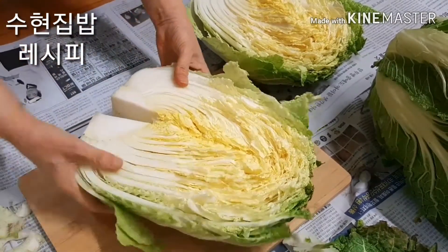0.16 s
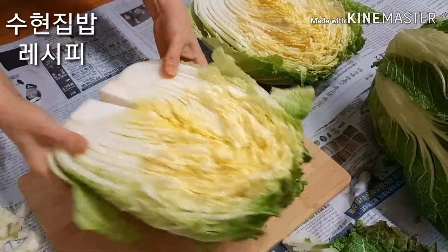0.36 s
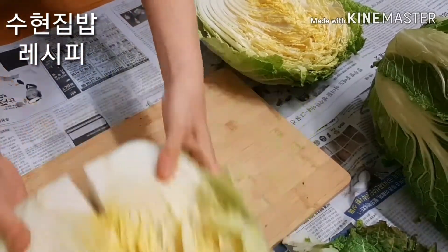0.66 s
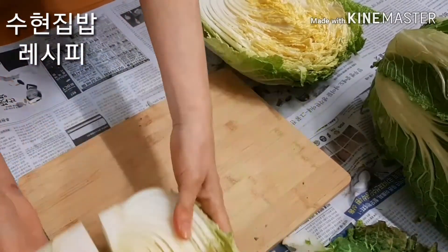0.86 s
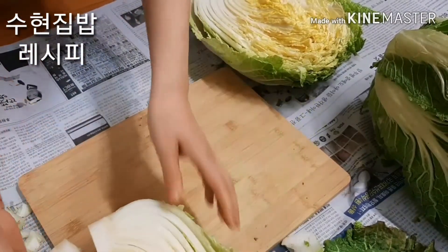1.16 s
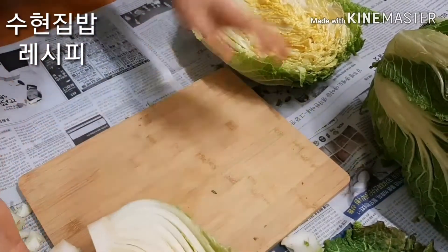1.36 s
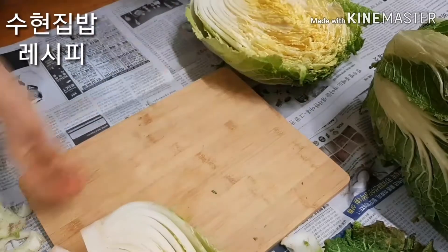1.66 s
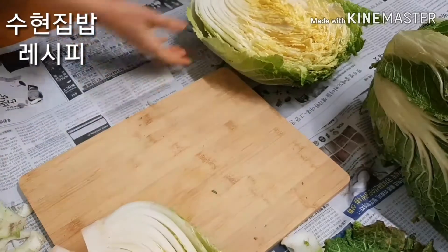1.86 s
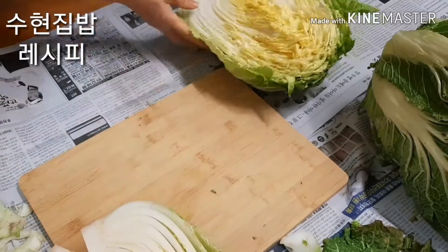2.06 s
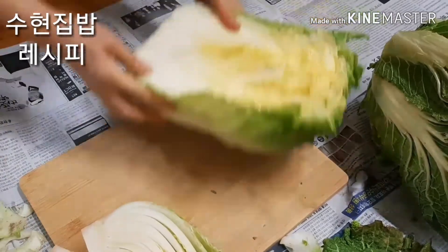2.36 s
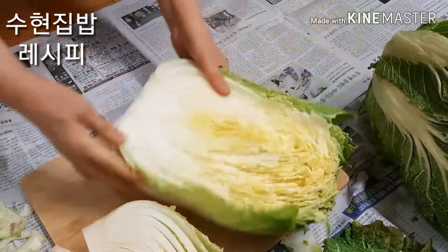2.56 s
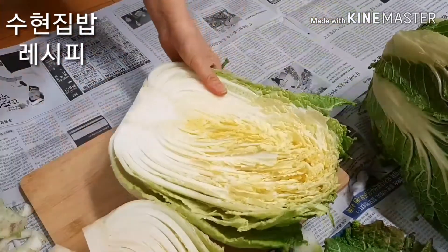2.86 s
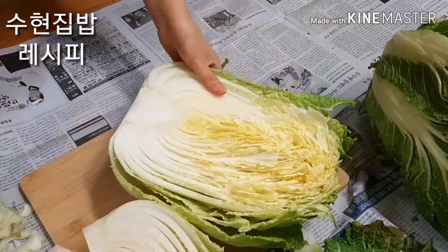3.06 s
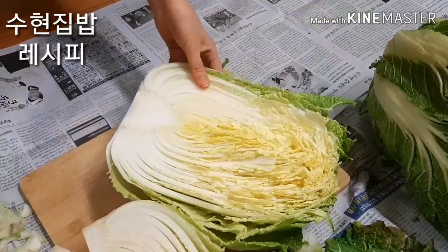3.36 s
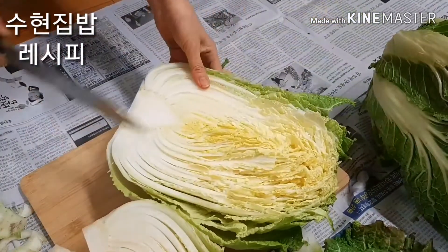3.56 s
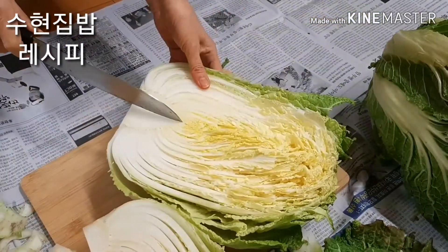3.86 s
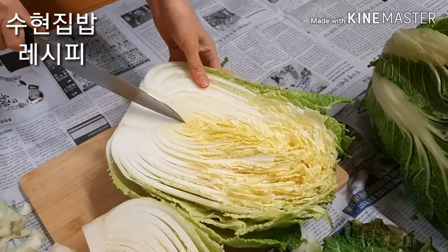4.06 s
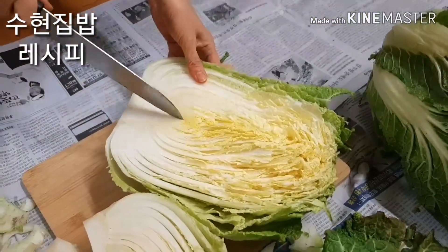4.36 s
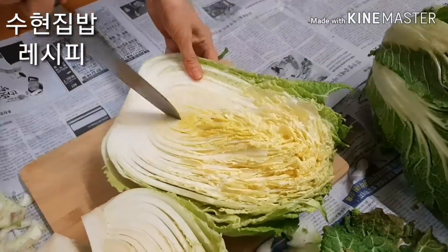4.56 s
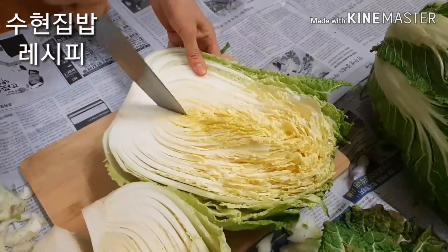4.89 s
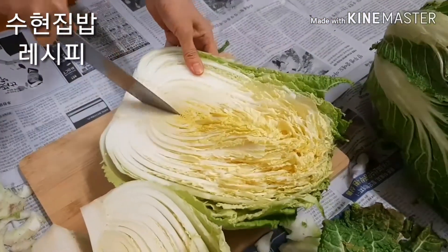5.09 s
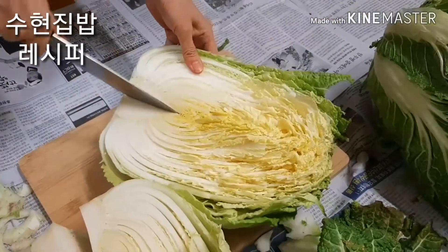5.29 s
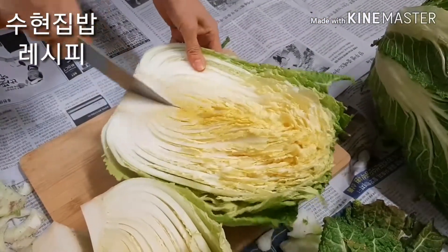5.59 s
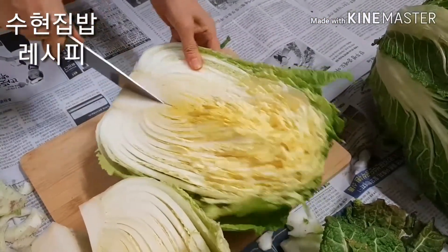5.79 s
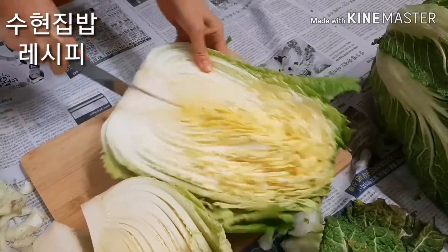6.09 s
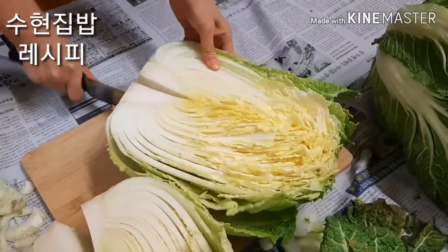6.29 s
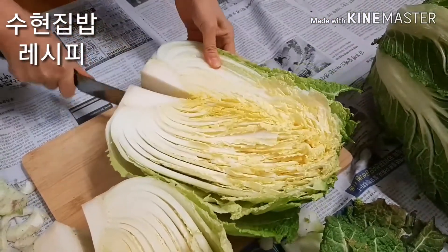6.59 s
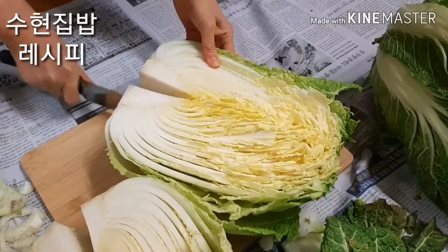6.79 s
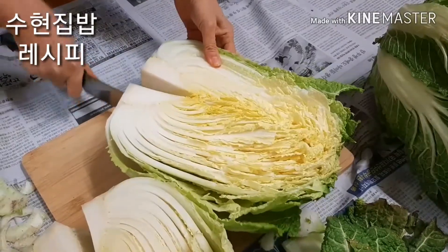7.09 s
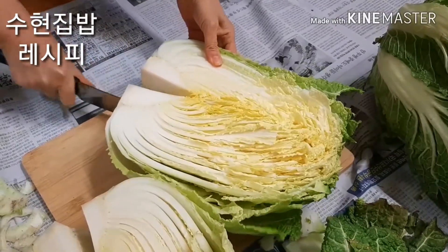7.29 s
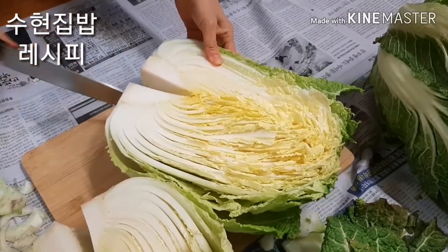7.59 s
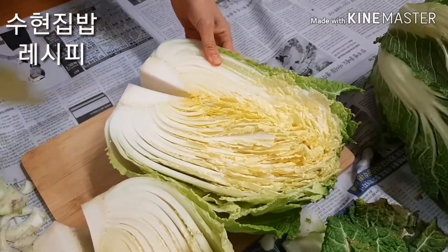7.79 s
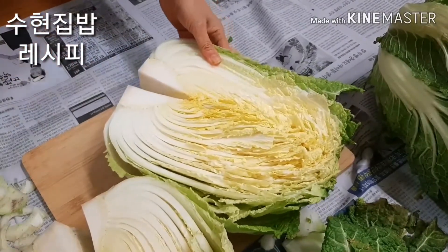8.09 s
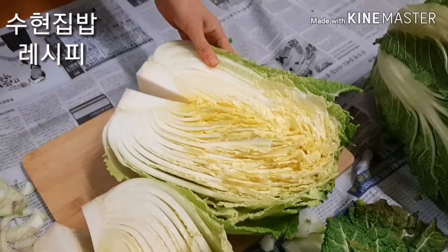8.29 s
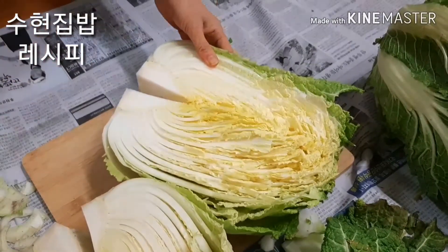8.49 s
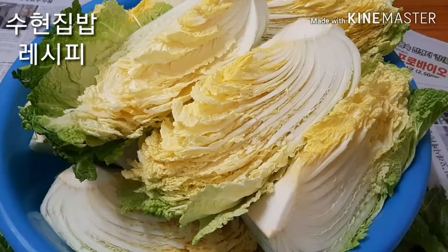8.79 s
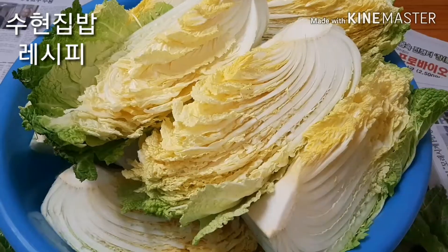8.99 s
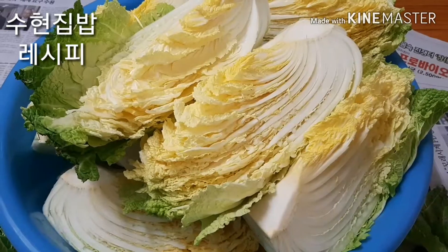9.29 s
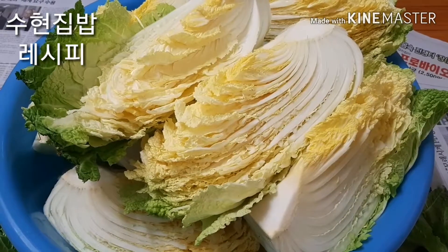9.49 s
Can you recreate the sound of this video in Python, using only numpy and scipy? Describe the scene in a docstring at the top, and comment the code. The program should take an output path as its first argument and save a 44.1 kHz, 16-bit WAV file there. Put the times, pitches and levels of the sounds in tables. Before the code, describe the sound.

Crisp cabbage leaves rustle and crackle on a wooden board, a knife crunches through the stalk, bangs loudly on wood, then abrupt quiet.

```python
"""A half cabbage is lifted off newspaper and laid on a wooden board: fine random breaks crackle and rub.
A knife saws the crisp stalk: bursts of breaks through fibre and pulp spectra, with snaps and creaks.
It breaks through in a dense rush and knocks on the board, is drawn out, and the leaves are gripped again.
Decaying noise answers each sound as a live kitchen, over a rumble and low tones.
All this is cut off abruptly; after a short silence only the noise of a quiet room is left."""
import sys
import numpy as np
from scipy import signal
from scipy.fft import rfft, irfft, next_fast_len
from scipy.io import wavfile
from scipy.ndimage import map_coordinates

SR = 44100
rng = np.random.default_rng(int(sys.argv[2]) if len(sys.argv) > 2 else 0)


def wav_record(signal):
    """Record a signal, one row per channel, as 16-bit PCM in the file named by sys.argv[1]."""
    frames = np.transpose(np.atleast_2d(signal))
    bounded = np.clip(frames, -1, 1)
    # unit amplitude maps onto the largest positive 16-bit level
    quanta = np.round(bounded * 32767).astype(np.int16)
    wavfile.write(sys.argv[1], SR, quanta)


N = 425565

# Event levels are relative; each source adds its own gain.
# Grips, lifts and shoves of the head. Each row: start in seconds, hold in seconds, crackle level in dB,
# rubbing level in dB.
GRIPS = [(0.0, 0.0083, -47.5, -49.5), (.1, 0.034, -65, -63.5), (.215, 0.017, -51, -58),
         (.255, .11, -44, -49), (.58, 0.044, -54, -77), (.655, 0.046, -55.5, -60.5), (.8, 0.12, -46, -50.5),
         (.88, 0.049, -40, -41.5), (.95, 0.1, -38, -41.5), (1.145, 0.095, -38.5, -53.5),
         (1.27, 0.036, -50.5, -57), (1.385, 0.019, -46.5, -61), (1.46, 0.16, -54.5, -64.5),
         (1.615, 0.018, -52, -57.5), (1.73, .02, -49.5, -56), (1.808, 0.022, -52, -56),
         (1.92, 0.053, -47.5, -55), (2.07, 0.052, -43.5, -48.5), (2.135, 0.017, -38, -46.5),
         (2.2, 0.065, -48.5, -56), (2.34, 0.0082, -45, -51), (2.518, 0.019, -46.5, -57),
         (2.638, 0.071, -42, -47.5), (2.79, 0.077, -54, -57), (2.95, 0.044, -53, -58),
         (3.09, 0.15, -56.5, -63), (3.215, .055, -50, -53.5), (7.9, .2, -79, -93),
         (8.15, 0.074, -76.5, -79.5), (8.275, 0.0097, -50.5, -50.5), (8.38, 0.057, -67.5, -66),
         (8.485, .06, -51.5, -57.5)]
# Leaves load, yield under the hand and settle.
GRIP_RISE_DB_PER_S, GRIP_SAG_DB_PER_S, GRIP_FALL_DB_PER_S = 392, 12.5, 261
# Pushes and pulls of the blade in the stalk. Each row: start in seconds, hold in seconds,
# tearing fibre level in dB, crunch level in dB.
STROKES = [(4.275, 0.056, -66, -86), (4.36, 0.23, -65, -77), (4.525, 0.13, -53.5, -68.5),
           (4.755, .045, -48, -63), (4.825, 0.048, -42.5, -46.5), (4.972, 0.054, -42.5, -44),
           (5.07, .12, -50.5, -52.5), (5.2, .07, -42.5, -49), (5.34, .02, -57, -51),
           (5.46, .095, -43.5, -39.5), (5.57, .09, -45, -42), (5.67, .16, -41, -43.5),
           (5.86, 0.24, -47, -53), (5.985, .05, -40, -46), (6.159, .02, -32, -34.5),
           (6.195, .105, -40.5, -37), (6.33, .13, -40.5, -43.5), (6.55, 0.015, -45.5, -49.5),
           (6.625, 0.029, -47, -48.5), (6.685, .05, -46.5, -47), (6.8, .04, -60.5, -64),
           (6.86, .03, -52, -62), (7.14, .07, -60, -75), (7.226, .01, -53, -51.5), (7.34, 0.24, -63.5, -59),
           (7.58, 0.062, -54, -61)]
# The edge bites, slows and stops.
STROKE_RISE_DB_PER_S, STROKE_SAG_DB_PER_S, STROKE_FALL_DB_PER_S = 650.5, 9.5, 280
# Last bundles of fibres giving way. Each row: start in seconds, hold in seconds, level in dB.
TEARS = [(6.906, .006, -23), (6.925, .03, -34.5), (7.06, .006, -47)]
# They strain, rip and let go.
TEAR_RISE_DB_PER_S, TEAR_SAG_DB_PER_S, TEAR_FALL_DB_PER_S = 759.5, 30, 449
# Loudest ribs snapping. Each row: start in seconds, level in dB, body level relative to the treble in dB,
# left-right balance in dB before widening.
SNAP_EVENTS = [(0.2616, -19.5, -18, 1.5), (1.019, -18, -3.5, -2.5), (1.033, -23, -12, -2),
               (1.7265, -37, -25, -5), (1.9086, -42, -27, -5.5), (2.3323, -29.5, -25, 7),
               (2.45, -31, -12.5, 2), (2.5002, -33.5, -17, 4.5), (3.2102, -30, -19, 5.5),
               (3.2295, -28, -18, 1.5), (3.2465, -28.5, -18, -1.5), (3.2644, -31, -22, -4),
               (4.3524, -40, -23, 5), (4.4083, -37.5, -16, 7.5), (4.4713, -37, -21.5, 2.5),
               (4.5198, -32.5, -18, 8), (4.71, -33.5, -30, 3.5), (4.9645, -30.5, -2.5, 9),
               (5.1335, -31.5, 1, -2.5), (5.231, -25.5, 5.5, 1), (5.5495, -27, -8, -0.5),
               (5.8155, -31.5, 2.5, 0), (5.983, -23, -16, -3), (6.01, -26, -13.5, -4.5),
               (6.1522, -17.5, -13.5, 9.5), (6.1575, -15.5, -12.5, -0.5), (6.1837, -17.5, -8.5, 0),
               (6.2916, -28, -2, -3), (6.62, -28, -20, 3.5), (7.519, -43.5, 0, 0),
               (8.2617, -28, -13.5, -2.5), (8.5039, -42, -1, -2.5)]
# Stalk or blade hitting the board. Each row: start in seconds, level in dB, pitch of the blow in Hz.
KNOCK_EVENTS = [(1.022, -24, 804), (2.651, -29, 708), (6.160, -15.5, 711), (6.292, -20.5, 950),
                (6.454, -26.5, 560), (6.9181, 2.5, 1100), (6.9225, -4, 900), (6.9292, -2.5, 1000),
                (6.938, -2.5, 1301), (6.9432, -5.5, 900), (6.951, -4, 950), (7.2295, -16, 745),
                (7.453, -49, 1196)]
# One stiff blow. Each row: multiple of its pitch, spectrum level in dB.
BLOW_SPECTRUM = [(.04, -48.5), (.15, -31), (.35, -21), (.6, -5.5), (.9, 2.5), (1.3, -1.5), (1.8, -5),
                 (2.7, -16.5), (4, -39), (8, -41), (16, -43.5)]
# Ring of the board. Each row: mode frequency in Hz, mean level in dB, 60 dB decay time in seconds.
BOARD_MODES = [(227, -31, 0.27), (357, -26.5, .25), (644.7, -17.5, .2), (764, -11.5, .16),
               (1020, -20.5, .14), (1102, -27, .14), (1410, -28, .1), (1563, -20, 0.34), (1722, -23.5, .3),
               (1940, -26, .14), (2270, -29.5, .16), (2420, -30.5, 0.14), (2950, -27.5, .1)]
# Heavy head bumping on the board. Each row: start in seconds, level in dB.
THUMP_EVENTS = [(0.0, -50), (1.02, -55), (1.611, -56.5), (2.2, -50.5), (2.65, -56), (6.456, -35.5),
                (6.926, -31.5)]
# Wet ribs sticking and slipping. Each row: start in seconds, length in seconds, centre pitch in Hz, level in dB.
CREAK_EVENTS = [(3.197, 0.026, 2460, -36), (5.126, 0.016, 1020, -42.5), (5.229, 0.031, 2490, -43),
                (5.546, 0.012, 3070, -35), (6.095, .17, 733, -40.5), (6.656, .099, 810, -50.5),
                (6.913, 0.047, 2580, -22.5), (7.427, 0.041, 1270, -52), (8.258, 0.0103, 4300, -36)]
# Low tones that swell and die. Each row: time of the peak in seconds, pitch at the peak in Hz, level in dB,
# fading in dB per second.
HUMS = [(.25, 113.5, -56.5, 17), (1.96, 91, -55, 60), (2.39, 92.3, -50, 103), (3.06, 91.5, -59, 200)]
HUM_RISE_DB_PER_S, HUM_SAG_HZ_PER_S = 260, 30

# Spectra of the sources. Each row: frequency in Hz, relative level in dB per Hz.
CRACKLE_SPECTRUM = [(200, -36), (900, -20.5), (2000, -11), (3500, -0.5), (5000, -2), (7500, -4),
                    (11000, -6.5), (15500, -6.5)]
RUB_SPECTRUM = [(60, -37), (200, -8.5), (450, -7), (750, -2.5), (1100, -4), (1900, -1.5), (3000, -0.5),
                (6000, -42.5), (15000, -51.5)]
FIBRE_SPECTRUM = [(200, -45), (900, -23), (2000, -9), (3000, 2), (5000, 0), (7500, -2.5), (11000, -4.5),
                  (15500, -5)]
CRUNCH_SPECTRUM = [(60, -55), (200, -17), (480, -13.5), (720, -3), (950, -5.5), (1550, -3.5), (2400, -4),
                   (4000, -12), (8000, -32), (15000, -43.5)]
TEAR_SPECTRUM = [(60, -30.5), (200, -17), (450, -3), (800, 3.5), (1800, -1), (3000, 2.5), (5000, -2.5),
                 (9000, -7), (15500, -10)]
SNAP_EDGE_SPECTRUM = [(300, -48.5), (1500, -21), (3000, -1.5), (4500, 0.5), (8000, 1), (12000, -2.5),
                      (15500, -11)]
SNAP_BODY_SPECTRUM = [(60, -48.5), (300, -21.5), (800, -11), (2000, -1.5), (4000, 0), (7000, -14),
                      (15000, -30)]
THUD_SPECTRUM = [(30, -49), (60, -24.5), (90, -7), (125, -3), (200, -1), (280, -4.5), (400, -3),
                 (650, -13.5), (1500, -29.5), (5000, -66.5)]
# Room noise of the kitchen and of the quiet room. Each row: frequency in Hz, relative level in dB per Hz.
KITCHEN_AIR_SPECTRUM = [(18, -53.5), (30, -34.5), (81, -3), (200, -18), (267, -16), (355, -18), (448, -24),
                        (629, -20.5), (774, -28), (978, -29.5), (1600, -35), (1970, -34.5), (2250, -33.5),
                        (15000, -34.5)]
QUIET_AIR_SPECTRUM = [(18, -56.5), (30, -30.5), (87, -1), (122, -11), (274, -11.5), (597, -28),
                      (662, -24.5), (905, -32.5), (1240, -35), (4200, -32), (5730, -37.5), (6530, -30),
                      (8250, -37.5), (15000, -35.5)]

# Kitchen room noise. Each row: time in seconds, level in dB.
KITCHEN_AIR_LEVEL = [(0, -63.5), (3.6, -66), (7.2, -64.5), (7.8, -78), (8.22, -67)]
# The kitchen sound is cut off abruptly. Each row: time in seconds, gain in dB.
KITCHEN_CUTOFF = [(8.552, -0.5), (8.578, -52), (8.7, -80)]
# The quiet room fades in. Each row: time in seconds, level in dB.
QUIET_AIR_LEVEL = [(8.6, -105), (8.64, -74), (8.76, -64.5), (9.15, -64), (9.65, -64)]
# Decay of the kitchen. Each row: frequency in Hz, 60 dB decay time in seconds.
KITCHEN_T60 = [(100, 0.46), (400, 0.41), (1000, 0.39), (2500, 0.39), (6000, 0.44), (15000, 0.4)]
# Stereo likeness of diffuse sound. Each row: frequency in Hz, left-right likeness from 0 to 1.
LIKENESS = [(60, 1), (150, 0.8), (400, 0.93), (1000, 0), (4000, 0.0094)]
# Colour of the microphones. Each row: frequency in Hz, left-right difference in dB.
MIC_DIFFERENCE = [(100, 0), (250, -4), (550, -3), (1100, -2.5), (2200, -3.5), (4200, -4), (8000, -1),
                  (13000, 1.5)]
TOP_HZ = 15800


def leaves():
    """Thin leaves crackle, with a sharper tick now and then, while the head rubs over paper and wood."""
    crackle_gain, rub_gain = efforts(GRIPS, GRIP_RISE_DB_PER_S, GRIP_SAG_DB_PER_S, GRIP_FALL_DB_PER_S)
    fine = fractures(rate_hz=2100, spread_db=3.0, clump_db=5.5, clump_hz=120)
    ticks = fractures(rate_hz=150, spread_db=4, clump_db=2, clump_hz=60)
    grains = fractures(rate_hz=2000, spread_db=3.0, clump_db=1.5, clump_hz=67)
    crackle = coloured(crackle_gain * (fine + .5 * ticks), CRACKLE_SPECTRUM)
    rub = coloured(rub_gain * (grains + .5 * ticks), RUB_SPECTRUM)
    return moving(crackle + amp(-1.0) * rub, wet_db=-6.5, early_db=0.5, pan_db=1.0)


def blade():
    """Cells burst along the edge; the thick stalk gives each burst a hollow crunch."""
    fibre_gain, crunch_gain = efforts(STROKES, STROKE_RISE_DB_PER_S, STROKE_SAG_DB_PER_S, STROKE_FALL_DB_PER_S)
    fine = fractures(rate_hz=2200, spread_db=3.5, clump_db=2, clump_hz=130)
    coarse = fractures(rate_hz=260, spread_db=5, clump_db=3, clump_hz=90)
    pulp = fractures(rate_hz=1100, spread_db=4.5, clump_db=3.5, clump_hz=180)
    # a whole leaf parting (coarse) is heard in fibres and stalk at once
    fibres = coloured(fibre_gain * (fine + 0.36 * coarse), FIBRE_SPECTRUM)
    crunch = coloured(crunch_gain * (coarse + 0.87 * pulp), CRUNCH_SPECTRUM)
    dry = amp(1.5) * fibres + amp(-2.0) * crunch
    return moving(dry, wet_db=-5.0, early_db=-2, pan_db=1.45)


def breakthrough():
    """The knife tears through the remaining leaves in a dense rush of breaks."""
    pull_gain, = efforts(TEARS, TEAR_RISE_DB_PER_S, TEAR_SAG_DB_PER_S, TEAR_FALL_DB_PER_S)
    rush = pull_gain * fractures(rate_hz=9800, spread_db=2, clump_db=-3.5, clump_hz=250)
    return moving(amp(0.5) * coloured(rush, TEAR_SPECTRUM), wet_db=-5.5, early_db=-1, pan_db=1.1)


def snaps(gain_db=11, body_gain_db=4, life_s=0.00077, rise_s=0.00013):
    """A rib cracks in a burst of a few milliseconds; thin ones tick brightly, thick ones have more body."""
    out, t = np.zeros((2, N)), np.arange(2048) / SR
    for s, db, body_db, pan_db in SNAP_EVENTS:
        crack = rng.standard_normal(len(t)) * np.exp(-t / life_s) * (1 - np.exp(-t / rise_s))
        crack /= np.linalg.norm(crack)
        edge = coloured(crack, SNAP_EDGE_SPECTRUM)
        body = amp(body_db + body_gain_db) * coloured(crack, SNAP_BODY_SPECTRUM)
        lead_ms = rng.normal(.15, 0.029)
        placed = heard(edge + body, wet_db=-1, early_db=0.5, pan_db=2.2 * pan_db, lead_ms=lead_ms)
        add(out, s, amp(db + gain_db) * placed)
    return out


def knocks(gain_db=11, ring_db=-27, ring_rise_s=0.0022):
    """Steel on wood: one stiff, quickly damped blow and the board's faint ring of decaying modes."""
    out, t = np.zeros((2, N)), np.arange(SR // 3) / SR
    for s, db, hz in KNOCK_EVENTS:
        blow = click([(hz * multiple, level_db) for multiple, level_db in BLOW_SPECTRUM])
        ring = np.zeros(len(t))
        for mode_hz, level_db, t60_s in BOARD_MODES:
            decay = amp(level_db + rng.normal(0, 2) - 60 * t / t60_s)
            ring += decay * np.sin(2 * np.pi * (mode_hz * t + rng.random()))
        dry = amp(ring_db) * ring * (1 - np.exp(-t / ring_rise_s))
        dry[:len(blow)] += blow
        add(out, s, amp(db + gain_db) * heard(dry, wet_db=-4, early_db=-3.0, pan_db=0.0))
    return out


def thumps():
    """The soft, heavy head pushes the board against the floor: a short swell of low noise."""
    out, t = np.zeros((2, N)), np.arange(SR // 6) / SR
    swell = np.exp(-t / .013) * (1 - np.exp(-t / .003))
    for s, db in THUMP_EVENTS:
        push = coloured(rng.standard_normal(len(t)) * swell, THUD_SPECTRUM)
        add(out, s, amp(db + 1) * heard(push, wet_db=-5, early_db=-12, pan_db=-1.5))
    return out


def creaks(slip_hz=260, cycles=1.8):
    """Wet ribs stick and slip on each other and the blade; each uneven slip rings for a few cycles."""
    out = np.zeros((2, N))
    for s, length_s, hz, db in CREAK_EVENTS:
        t = np.arange(int(length_s * SR)) / SR
        slip_times = np.cumsum(rng.uniform(.5, 1.5, 64)) / slip_hz - 1 / slip_hz
        age = np.maximum(t - slip_times[:, None], 0)
        pitch_hz = hz * np.exp(0.068 * rng.standard_normal((len(slip_times), 1)))
        envelope = pitch_hz * age * np.exp(-2 * age * pitch_hz / cycles)
        slips = np.sum(np.sin(2 * np.pi * pitch_hz * age) * envelope, axis=0)
        dry = unit(slips) * np.sin(np.pi * t / length_s)
        add(out, s, amp(db) * heard(dry, wet_db=-11.5, early_db=2.5, pan_db=2.5))
    return out


def drone():
    """A faint, unsteady low tone that sags in pitch as it fades."""
    out, t = np.zeros(N), np.arange(N) / SR
    waver = 1 + .035 * wobble(30)
    for s, hz, db, fade_db_per_s in HUMS:
        age = t - s
        pitch_hz = (hz - HUM_SAG_HZ_PER_S * np.clip(age, 0, 1)) * waver
        level_db = db + np.minimum(HUM_RISE_DB_PER_S * age, -fade_db_per_s * age)
        out += amp(level_db) * np.sin(2 * np.pi * np.cumsum(pitch_hz) / SR)
    return np.sqrt(2) * amp(-0.5 + 2.1 * wobble(24)) * out


def air(spectrum):
    """Steady room noise, mixed from mid and side so that the bass is alike on both sides."""
    def mid_side(hz):
        turn = np.arccos(np.clip(along(LIKENESS, hz), 0, 1)) / 2
        return amp(along(spectrum, hz)) * [np.cos(turn), np.sin(turn)]

    mid, side = filtered(rng.standard_normal((2, N)), mid_side)
    return unit(np.array([mid + side, mid - side]))


def kitchen(x):
    """The room's tail builds up quickly, then each band dies at its own rate."""
    hz, t, z = reflections(SR // 2)
    tail = signal.istft(z * amp(-60 * t / along(KITCHEN_T60, hz)[:, None]), SR)[1]
    tail = tail * (1 - np.exp(-np.arange(tail.shape[1]) / SR / 0.0064))
    return signal.fftconvolve(x[None], tail / np.linalg.norm(tail[0]), axes=1)


def reflections(length, size=256):
    """Diffuse stereo noise as short spectra, alike on both sides in the bass."""
    hz, t, z = signal.stft(rng.standard_normal((2, length)), SR, nperseg=size)
    alike = np.clip(along(LIKENESS, hz), 0, 1)[:, None]
    z[1] = alike * z[0] + np.sqrt(1 - alike ** 2) * z[1]
    return hz, t, z


def nearby(x, early_db, lead_ms, early_t60_s=0.11):
    """Direct sound, never later at the left microphone, then echoes off floor and furniture."""
    t = np.arange(SR // 12) / SR
    # cubed noise: a few strong echoes among many weak ones
    paths = rng.standard_normal((2, len(t))) ** 3 * amp(-60 * t / early_t60_s) * (t > .001)
    paths *= amp(early_db) / np.linalg.norm(paths, axis=1, keepdims=True)
    paths[0, 0] += 1
    paths[1, int(abs(lead_ms) * SR / 1000)] += 1
    return signal.fftconvolve(x[None], paths, axes=1) / np.sqrt(1 + amp(early_db) ** 2)


def heard(x, wet_db, early_db, pan_db, lead_ms=0.2):
    """One short sound in the kitchen: direct sound, early echoes and tail."""
    out = amp(wet_db) * kitchen(x)
    close = nearby(x, early_db, lead_ms)
    out[:, :close.shape[1]] += close
    return out * amp([[pan_db / 2], [-pan_db / 2]])


def moving(x, wet_db, early_db, pan_db):
    """Leaves break at different spots, so direction and reflections change piece by piece."""
    out = np.zeros((2, N))
    for s, piece in stretches(x, count=320):
        add(out, s, nearby(piece, early_db, rng.normal(.15, .1)))
    for s, piece in stretches(x, count=24):
        add(out, s, amp(wet_db) * kitchen(piece))
    return out * amp([[pan_db / 2], [-pan_db / 2]])


def stretches(x, count):
    """The sounding pieces of x with their start times."""
    edges = np.linspace(0, N, count + 1).astype(int)
    return [(a / SR, x[a:b]) for a, b in zip(edges, edges[1:]) if np.abs(x[a:b]).max() > 1e-7]


def efforts(rows, rise_db_per_s, sag_db_per_s, fall_db_per_s):
    """Each move swells, sags while held and dies away; one gain curve per level column."""
    power, t = np.zeros((len(rows[0]) - 2, N)), np.arange(N) / SR
    for s, hold_s, *levels_db in rows:
        near = slice(max(int((s - .5) * SR), 0), int((s + 1) * SR))
        age = t[near] - s
        shape_db = rise_db_per_s * np.minimum(age, 0)
        shape_db -= sag_db_per_s * np.maximum(age, 0)
        shape_db -= fall_db_per_s * np.maximum(age - hold_s, 0)
        power[:, near] += np.outer(amp(levels_db), amp(shape_db)) ** 2
    return np.sqrt(power)


def fractures(rate_hz, spread_db, clump_db, clump_hz):
    """Tiny breaks at random times, uneven in size and louder in bunches; rms 1."""
    breaks = (rng.random(N) < rate_hz / SR) * rng.choice([-1, 1], N)
    size_db = spread_db * np.clip(rng.standard_normal(N), -2, 2)
    return unit(breaks * amp(size_db + clump_db * np.tanh(wobble(clump_hz))))


def wobble(knots_per_s):
    """A smooth random curve of rms 1."""
    knots = rng.standard_normal(int(N * knots_per_s / SR) + 4)
    return unit(map_coordinates(knots, [np.arange(N) * knots_per_s / SR]))


def click(spectrum, size=2048):
    """The causal (minimum-phase) pulse of energy 1 with this spectrum, by folding its cepstrum."""
    cepstrum = irfft(np.log(amp(along(spectrum, np.fft.rfftfreq(size, 1 / SR)))))
    cepstrum[1:size // 2] *= 2
    cepstrum[size // 2 + 1:] = 0
    pulse = irfft(np.exp(rfft(cepstrum)))
    return pulse / np.linalg.norm(pulse)


def coloured(x, spectrum):
    """x rings through a body with this spectrum."""
    return signal.oaconvolve(x, click(spectrum))[:len(x)]


def filtered(x, response):
    """x times a response of frequency."""
    n = x.shape[-1]
    m = next_fast_len(n + 8192, True)
    return irfft(rfft(x, m) * response(np.fft.rfftfreq(m, 1 / SR)), m)[..., :n]


def add(track, s, sound):
    """Mix a stereo sound in at time s."""
    start = max(round(s * SR), 0)
    part = sound[:, :max(N - start, 0)]
    track[:, start:start + part.shape[1]] += part


def amp(db):
    """Decibels to gain."""
    return 10 ** (np.asarray(db) / 20)


def unit(x):
    """Scale to rms 1."""
    return x / np.sqrt(np.mean(x ** 2) + 1e-20)


def along(points, hz):
    """Interpolate (Hz, value) points on a log frequency axis."""
    f, v = np.transpose(points)
    return np.interp(np.log(hz + 1), np.log(f + 1), v)


def curve(rows):
    """Interpolate (s, value) rows to one value per sample."""
    s, values = np.transpose(rows)
    return np.interp(np.arange(N) / SR, s, values)


def scene():
    """Cabbage, knife and board over the kitchen's rumble, then a quiet room alone."""
    work = leaves() + blade() + breakthrough() + creaks() + snaps() + knocks() + thumps()
    background = drone() + amp(curve(KITCHEN_AIR_LEVEL)) * air(KITCHEN_AIR_SPECTRUM)
    t = np.arange(N) / SR
    present = (t >= QUIET_AIR_LEVEL[0][0]) * (t <= QUIET_AIR_LEVEL[-1][0])
    quiet_room = amp(curve(QUIET_AIR_LEVEL)) * present * air(QUIET_AIR_SPECTRUM)
    return (work + background) * amp(curve(KITCHEN_CUTOFF)) + quiet_room


def record(dry):
    """Two microphones of different colour, soft rounding of strong peaks, then a band limit at TOP_HZ."""
    picked_up = filtered(dry, lambda hz: amp(np.outer([.5, -.5], along(MIC_DIFFERENCE, hz))))
    rounded = picked_up / (1 + np.abs(picked_up / .92) ** 4) ** (1 / 4)
    return filtered(rounded, lambda hz: hz < TOP_HZ)


dry = scene()
out = record(dry)
wav_record(out)
```